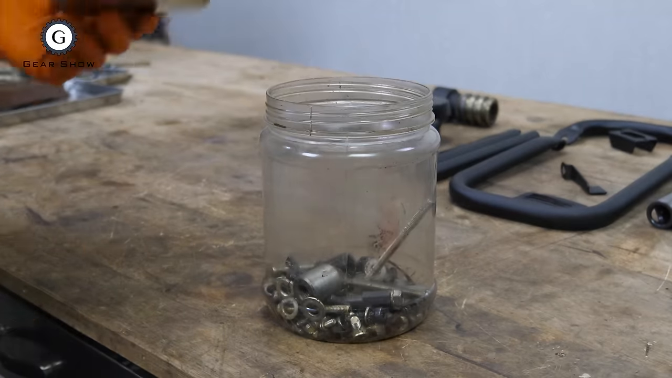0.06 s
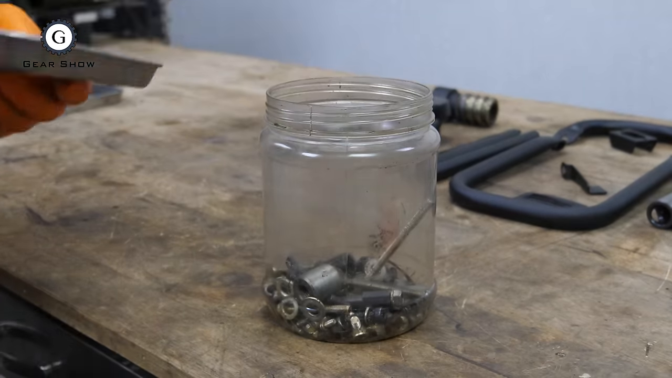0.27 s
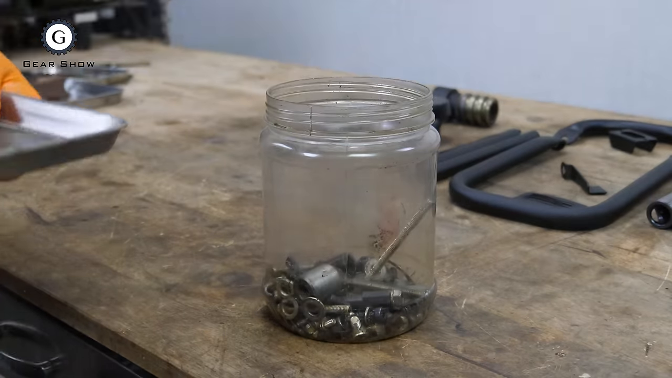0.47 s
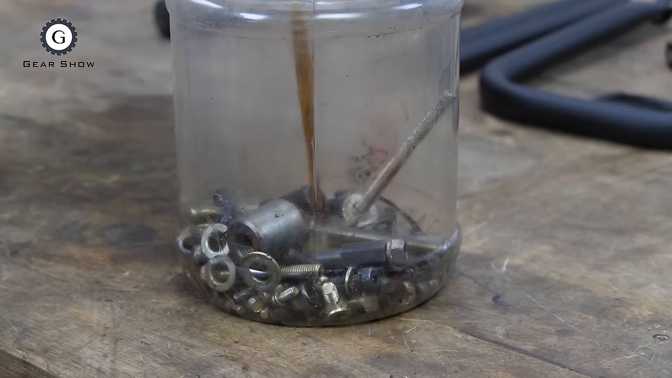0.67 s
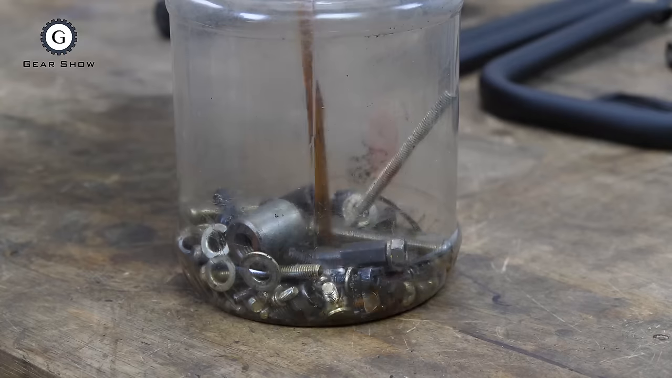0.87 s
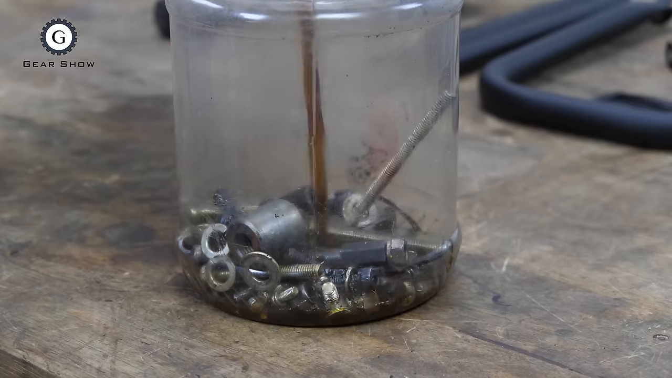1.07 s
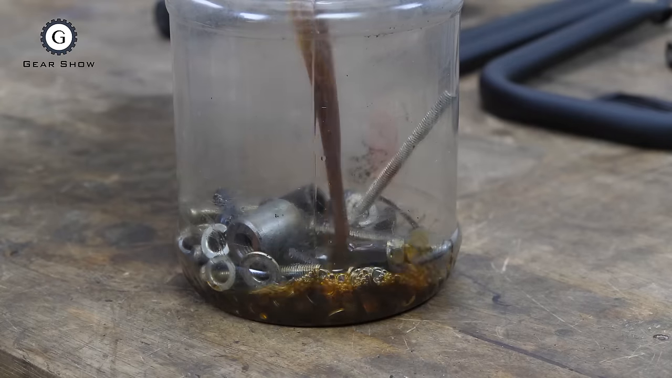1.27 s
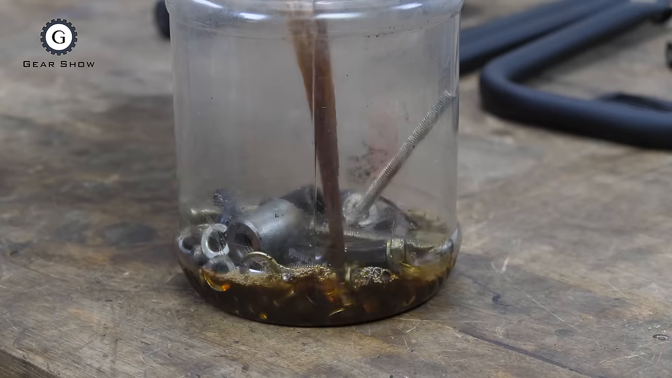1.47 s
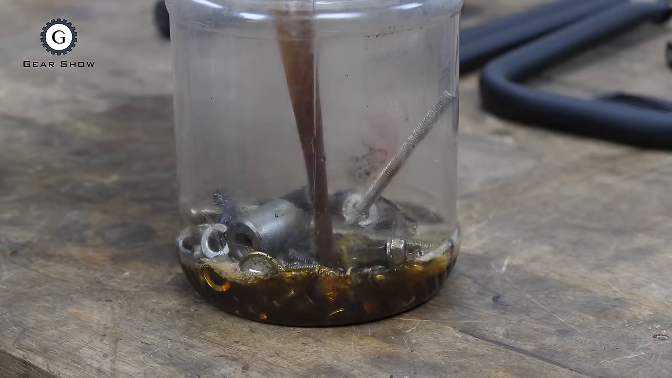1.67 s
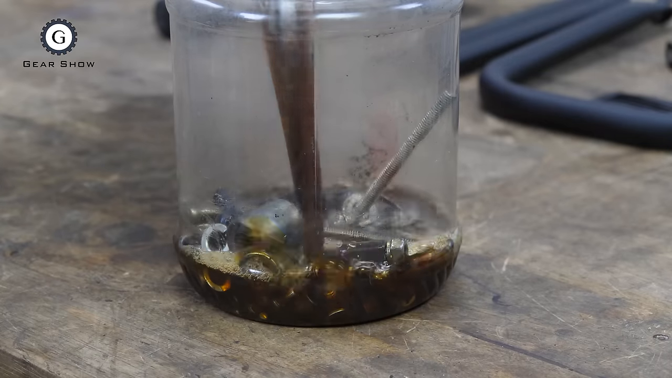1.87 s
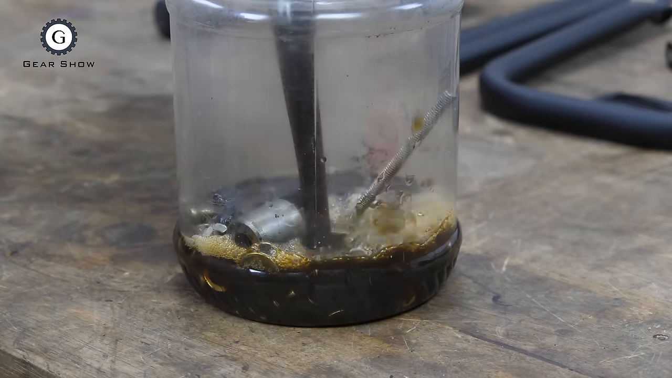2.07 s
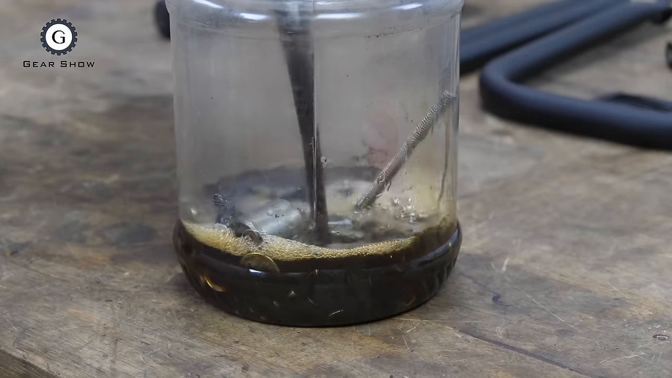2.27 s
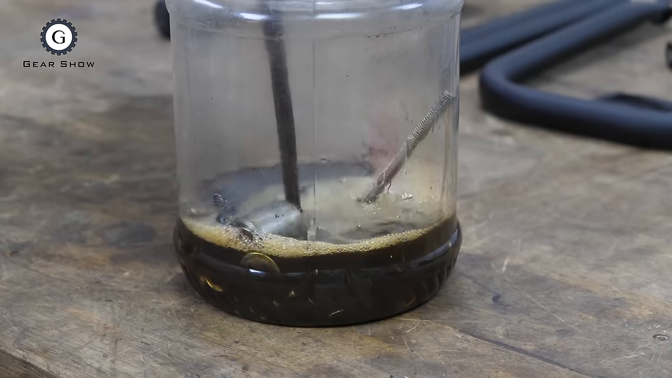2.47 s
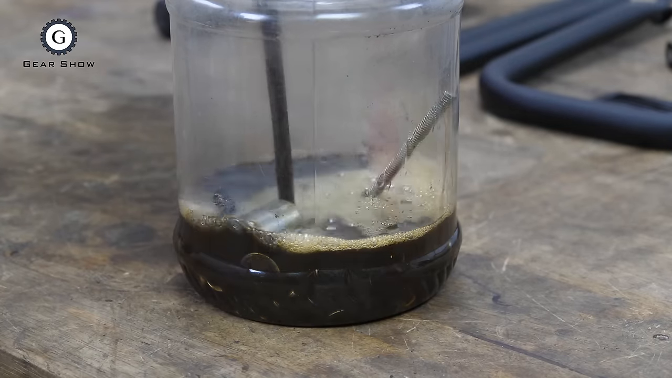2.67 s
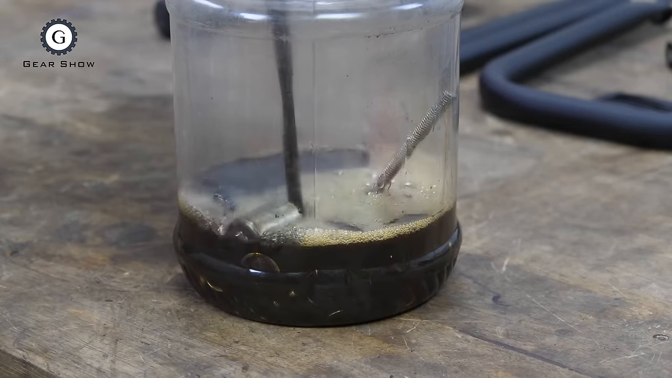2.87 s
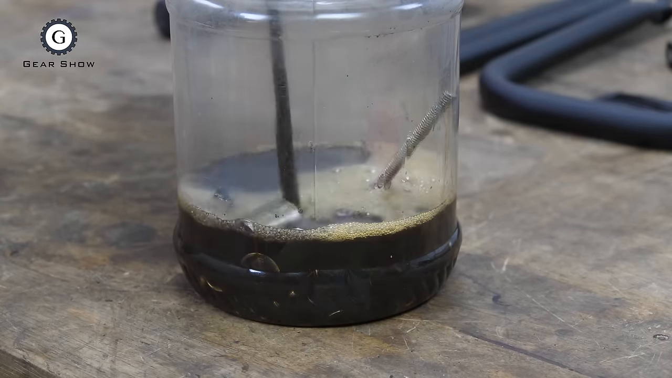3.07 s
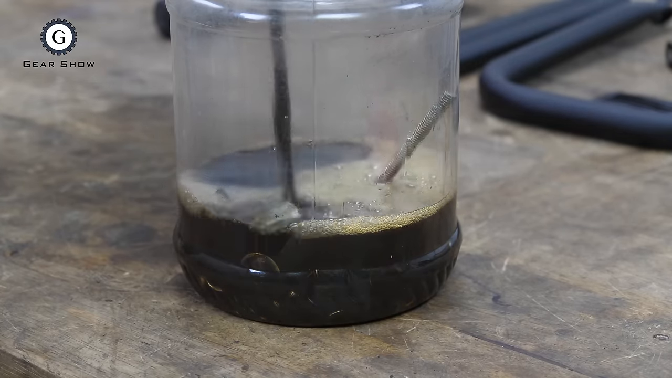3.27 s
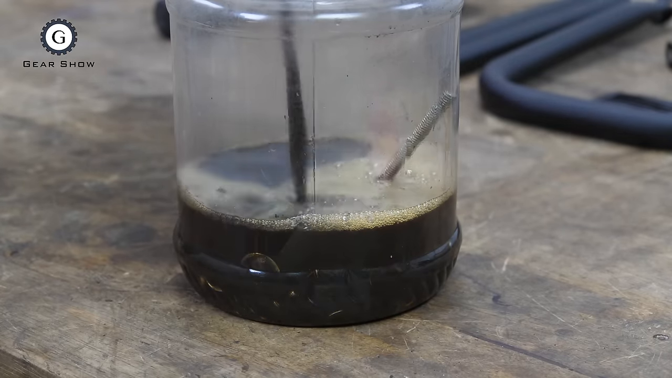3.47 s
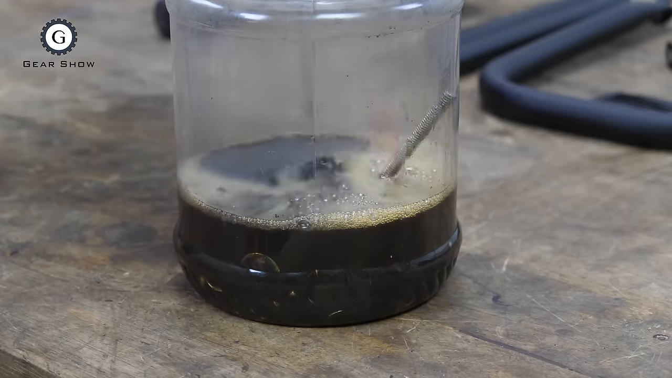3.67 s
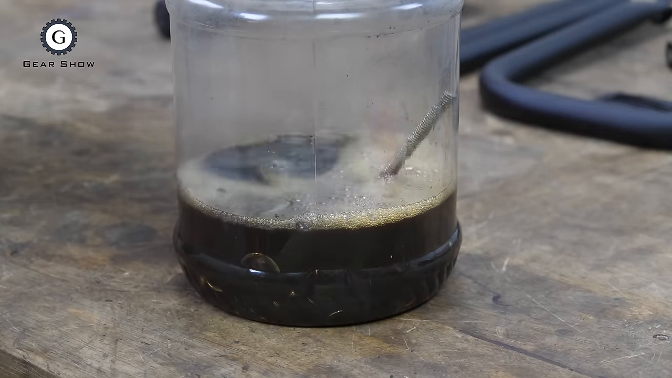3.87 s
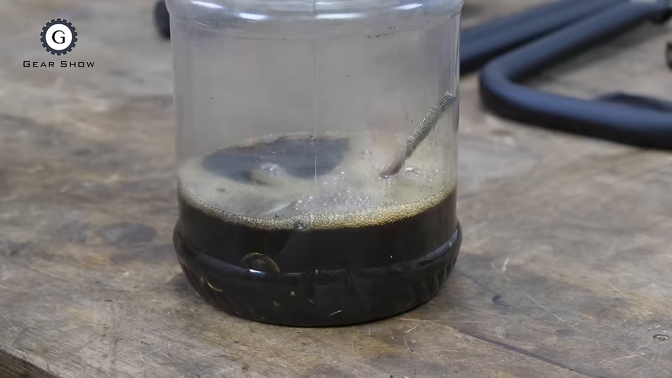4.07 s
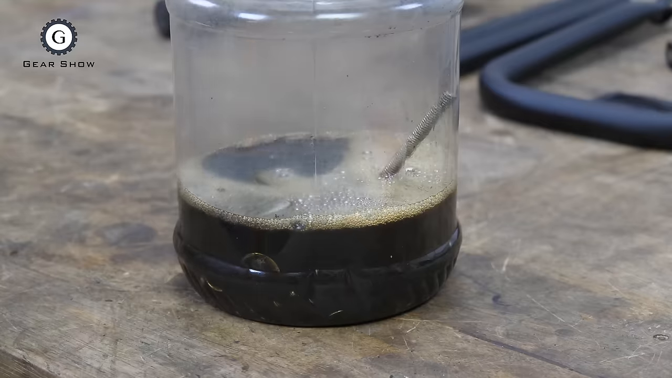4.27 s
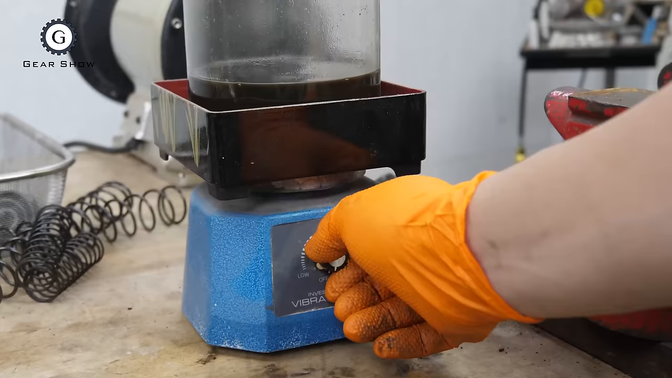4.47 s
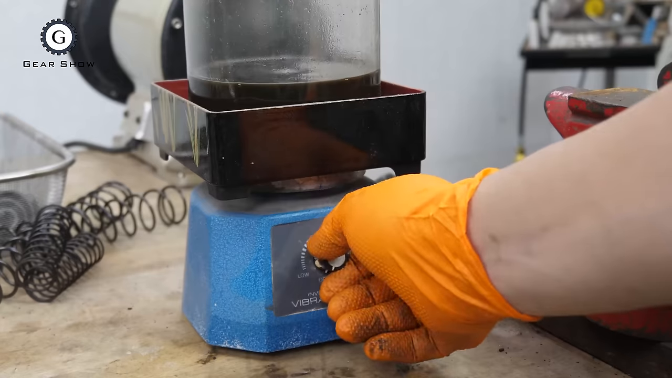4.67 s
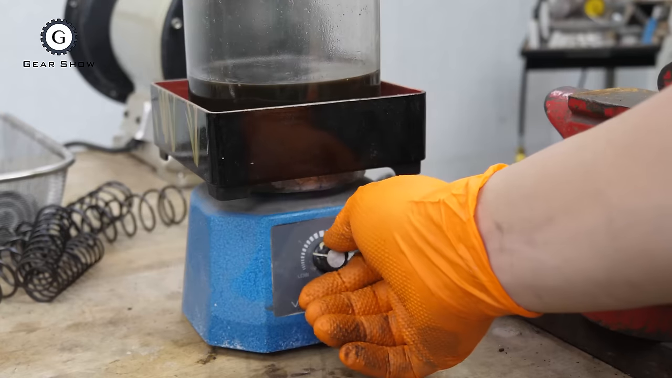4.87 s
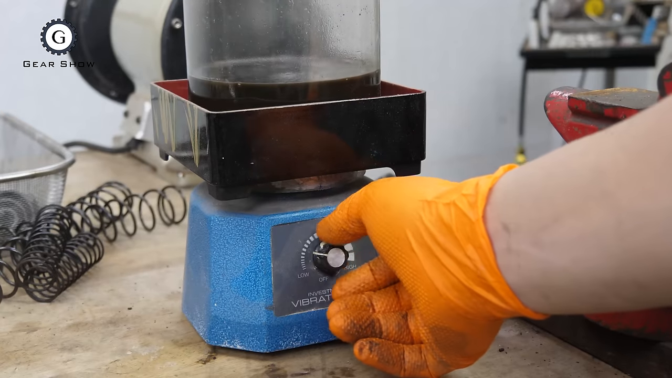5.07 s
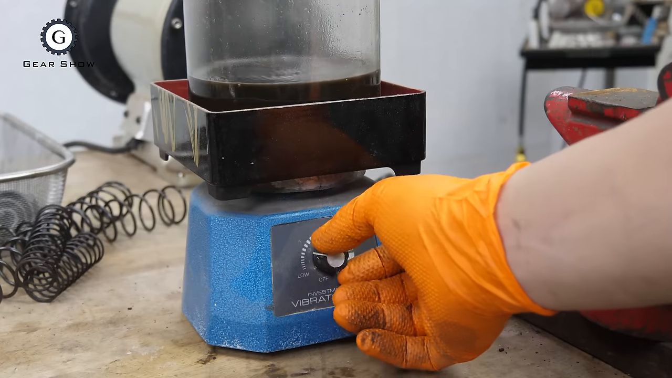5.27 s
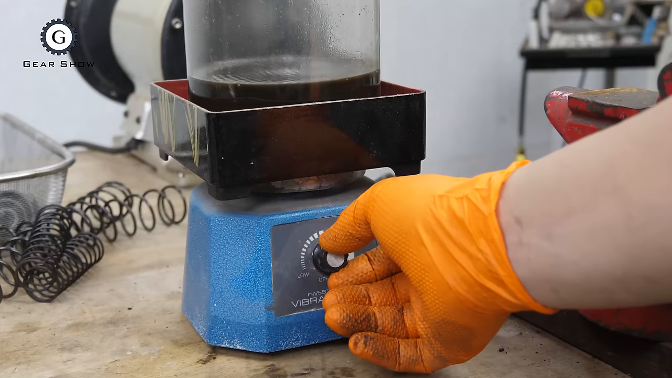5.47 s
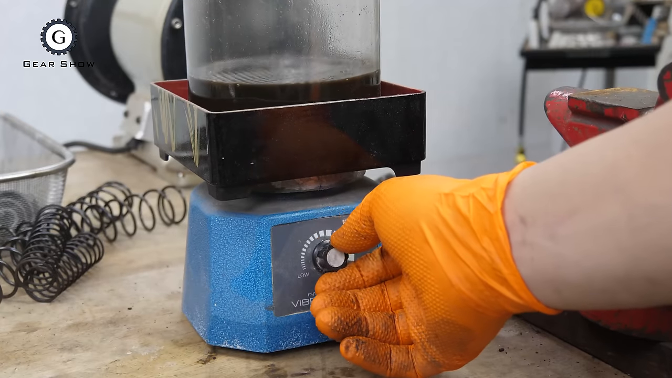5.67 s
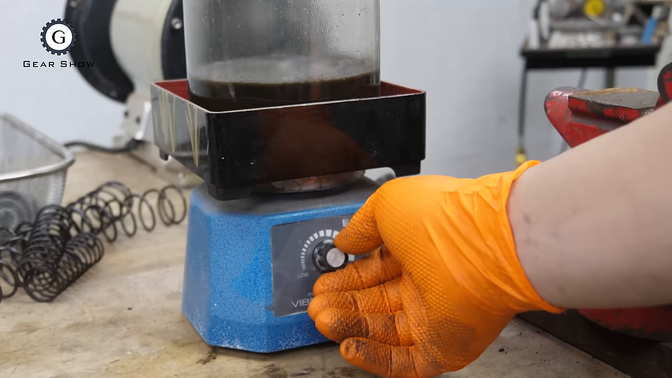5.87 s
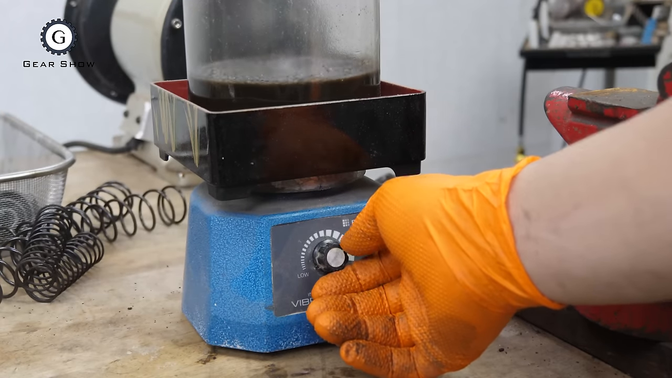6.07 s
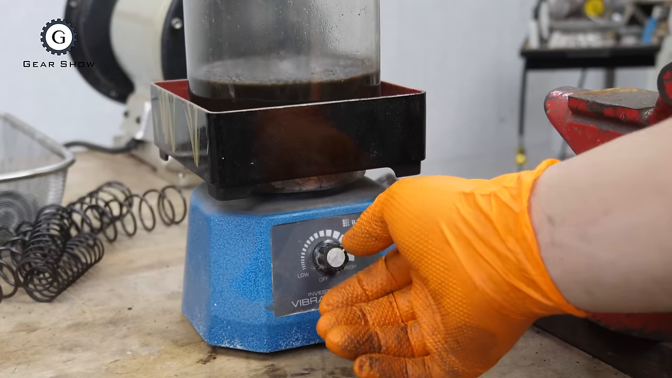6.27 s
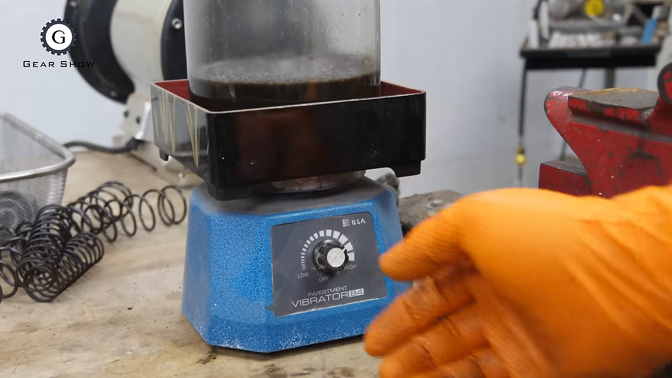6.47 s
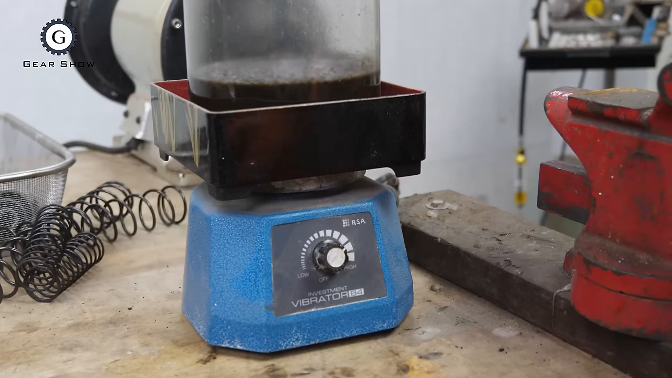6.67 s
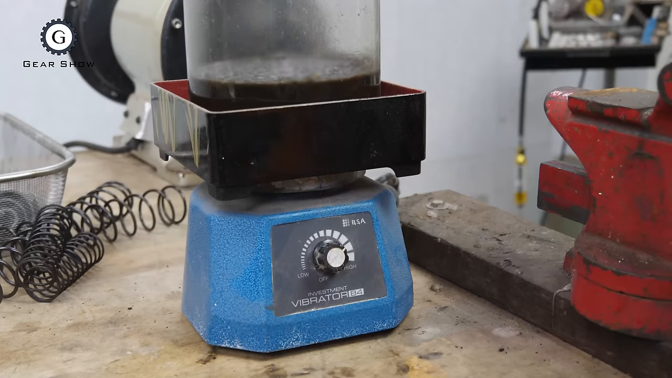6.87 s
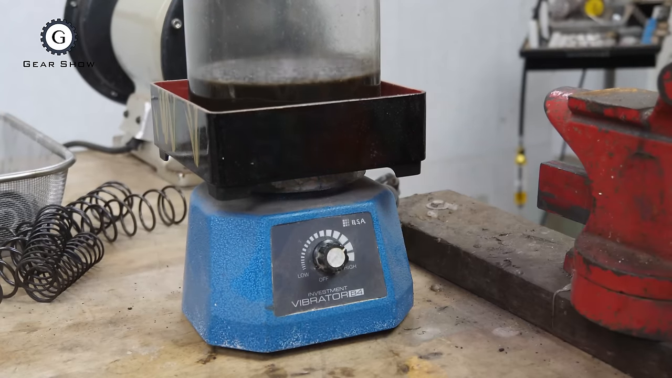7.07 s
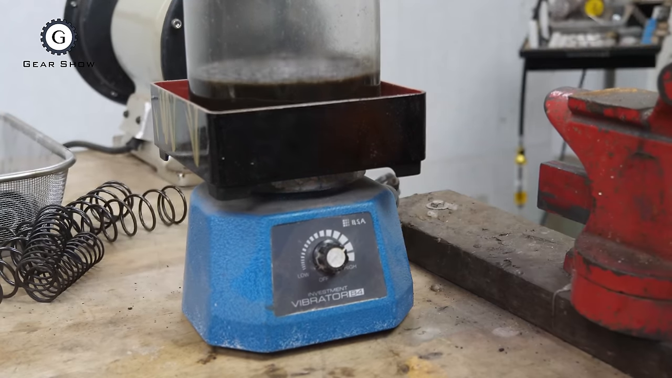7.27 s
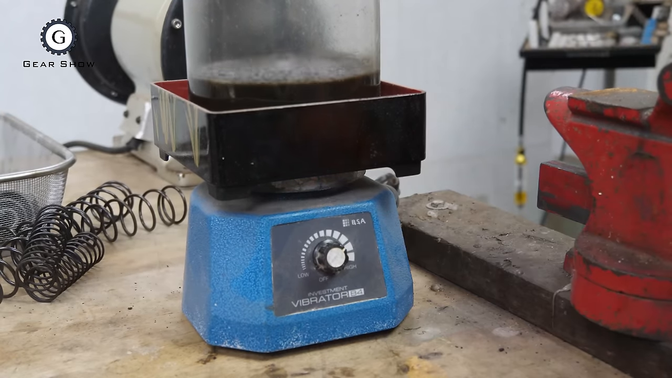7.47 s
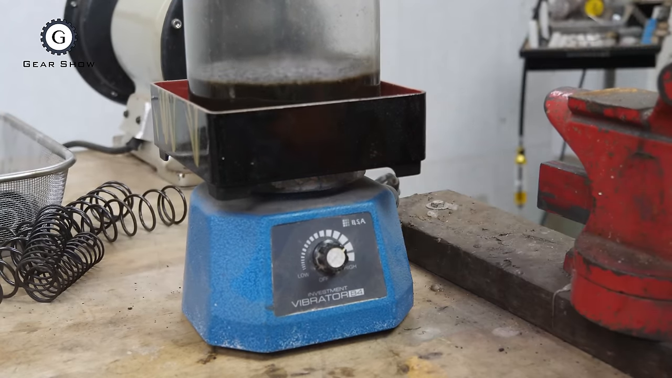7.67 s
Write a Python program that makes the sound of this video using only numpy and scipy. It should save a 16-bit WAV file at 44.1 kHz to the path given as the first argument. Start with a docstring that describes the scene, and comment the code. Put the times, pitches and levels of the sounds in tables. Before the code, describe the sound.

Very faint workshop air, with a slight stir near 0.3 s. At 0.7 s a close, dry pour cuts in over a low room hum: bright, hissing spray on bare metal in a plastic jar, with a faint high ping. It thickens from 1.25 s, gulps deeply around 2.0 and 2.25 s, then thins to a dripping trickle from 2.5 s, with bubbles ringing in the jar. A fuller gurgle returns at 3.3-3.6 s and a last sharp splat falls near 3.8 s. Light rustling and a tiny falling scrape lead to a dull wooden knock at 4.07 s with a small rebound. Near silence from 4.4 s. At 4.85 s a switch snaps with a short springy ring, and a hundred-beat-per-second buzz begins, with jar clatter and fine metal rattle. Around 5.5-5.7 s it stumbles with knocks, then shakes louder and rougher, easing slightly, its middle hum stronger after 7 s, running to the end.

```python
"""A workshop bench: liquid is poured over loose metal parts in a plastic jar, then something is set down.
The stream is filtered droplet noise with bubbles and plops; the set-down is a scrape, thuds and ringing modes.
After a short silence a switch snaps and a vibratory tumbler shakes the jar a hundred times a second,
with hum lines locked to the beat and noise bursts for jar and parts.
Its knob is turned up: the buzz stumbles, then the jar bounces harder, every second blow unlike the first."""
import sys
import numpy as np
from scipy import signal
from scipy.fft import rfft, irfft
from scipy.io import wavfile
from scipy.ndimage import uniform_filter1d, map_coordinates

SR = 44100
rng = np.random.default_rng(int(sys.argv[2]) if len(sys.argv) > 2 else 0)


def dump(signal):
    """Clip the signal to [-1, 1] and save it as 16-bit WAV at the path in sys.argv[1]."""
    limited = np.clip(np.atleast_2d(signal).T, -1, 1)
    pcm = np.round(limited * 32767).astype(np.int16)
    wavfile.write(sys.argv[1], SR, pcm)


N = 340011
TIME = np.arange(N) / SR
FIRST_BLOW_S = 4.8618

# spectrum of the jar's dull thump in its tray [f/Hz, level/dB per Hz]
THUMP_COLOUR = [(70, -43), (120, -18.5), (190, -6), (310, 0), (500, 2), (640, -12.5), (1000, -21)]
# spectrum of the shaken jar [f/Hz, level/dB per Hz]
CLATTER_COLOUR = [(50, -43), (90, -33.5), (160, -14), (330, -6.5), (480, 0.5), (750, -4), (1100, -1.5),
                  (1350, -1.5), (1700, 4.5), (2100, -2.5), (2500, -4.5), (3000, -15), (4500, -26)]
# spectrum of the metal parts in it [f/Hz, level/dB per Hz]
RATTLE_COLOUR = [(1500, -27), (2500, -1), (3100, -3), (3700, 0.5), (4900, 2), (5600, -4.5), (6300, -6),
                 (7200, -2.5), (8500, -11.5), (9400, -7.5), (11000, -13.5), (13500, -13.5), (15500, -21.5)]
# spectrum of splashing in the jar, also of low rasps [f/Hz, level/dB per Hz]
SPLASH_COLOUR = [(700, -9), (1300, -14), (1750, -3), (2500, -2), (3000, -2), (3900, -3), (4500, 4),
                 (5200, -5.5), (6500, -15)]
# middle resonances of the air in the jar [f/Hz, width/Hz, level/dB]
JAR_MID_PEAKS = [(3240, 185, 0.012), (3580, 280, -1.6), (4770, 360, -1)]
# high resonances of the air in the jar [f/Hz, width/Hz, level/dB]
JAR_HIGH_PEAKS = [(6100, 280, -3.5), (7450, 240, 2.5), (9000, 247, -1.5), (9630, 450, 1.5),
                  (11260, 390, -3.5), (12900, 800, -3)]


def amp(db):
    """Decibels to gain."""
    return 10 ** (np.asarray(db) / 20)


def unit(x):
    """Scales to rms 1."""
    return x / np.sqrt(np.mean(x ** 2) + 1e-20)


def curve(rows, column=1):
    """One column of a timed table, at every sample."""
    rows = np.array(rows)
    return np.interp(TIME, rows[:, 0], rows[:, column])


def read(points, hz):
    """A spectrum joined by straight lines over log frequency."""
    f, value = np.transpose(points)
    return np.interp(np.log(hz + 1), np.log(f), value)


def during(start, end):
    """A gate with 3 ms edges."""
    opening = np.clip((TIME - start) / .003, 0, 1)
    closing = np.clip((end - TIME) / .003, 0, 1)
    return opening * closing


def swell(peak, rise, fall):
    """A smooth hump of height 1."""
    return np.exp(-((TIME - peak) / np.where(TIME < peak, rise, fall)) ** 2)


def ramp(end, length):
    """Goes from 0 to 1, arriving at a given time."""
    return np.clip(1 + (TIME - end) / length, 0, 1)


def add(mix, s, sound):
    """Mixes a sound in at a time."""
    part = mix[..., round(s * SR):][..., :sound.shape[-1]]
    part += sound[..., :part.shape[-1]]


def drift(rate):
    """Random wobble of rms 1, up to a given rate in Hz."""
    hz = np.fft.rfftfreq(N, 1 / SR)
    return unit(irfft(rfft(rng.standard_normal(N)) / (1 + (hz / rate) ** 4), N))


def colour(x, points):
    """Causal filter with a given spectrum that falls away beyond its ends; keeps the power of white noise."""
    hz = np.fft.rfftfreq(4096, 1 / SR) + 1
    octaves_beyond = np.log2(np.maximum(np.maximum(points[0][0] / hz, hz / points[-1][0]), 1))
    log_gain = np.log(amp(read(points, hz) - 20 * octaves_beyond))
    # the Hilbert transform of the log gain gives the minimum phase
    response = np.exp(signal.hilbert(np.r_[log_gain, log_gain[-2:0:-1]]).conj())
    taps = np.fft.ifft(response).real[:len(hz)]
    taps = np.array(taps / np.linalg.norm(taps), ndmin=x.ndim)
    return signal.oaconvolve(x, taps, axes=-1)[..., :x.shape[-1]]


def resonate(x, peaks):
    """Steep resonances side by side, each filtered twice."""
    out = 0
    for hz, width, db in peaks:
        b, a = signal.iirpeak(min(hz, SR / 2 - 1), hz / width / np.sqrt(2), SR)
        once = signal.lfilter(b, a, x)
        out = out + amp(db) * signal.lfilter(b, a, once)
    return out


def ring(modes):
    """Dying modes after one blow, peak 1; decay times are held between 5 and 250 ms."""
    t = TIME[:SR // 2]
    sound = 0
    for hz, db, t60 in modes:
        fade = amp(db - 60 * t / np.clip(t60, .005, .25))
        sound = sound + fade * np.sin(2 * np.pi * hz * t)
    return sound / abs(sound).max()


def spread(pair, side_db):
    """Turns two unrelated signals into left and right."""
    return pair[0] + amp(side_db) * np.array([pair[1], -pair[1]])


def room(x):
    """The workshop's tail: random reflections from 4 ms on, each band dying at its own pace."""
    # decay of the workshop [f/Hz, t60/s]
    room_t60 = [(200, 0.23), (1000, 0.25), (4000, 0.64), (15000, 0.19)]
    hz, t, z = signal.stft(rng.standard_normal((2, SR // 2)), SR, nperseg=256)
    fade = amp(-60 * t / read(room_t60, hz)[:, None])
    tail = signal.istft(z * fade, SR, nperseg=256)[1]
    tail[:, :SR // 250] = 0
    return signal.fftconvolve(x[None], tail / np.linalg.norm(tail[0]), axes=1)[:, :N]


def tumbler():
    """Each blow of the shaker drives the housing's hum, a clatter of the jar and a burst of rattling parts."""
    # beat of the shaker [t/s, rate/blows per s]
    beat = [(4.8, 100.04), (6.0, 100.05), (6.6, 100.1), (7.8, 100.11)]
    turns = np.cumsum(curve(beat)) / SR
    turns -= np.interp(FIRST_BLOW_S, TIME, turns)
    on = turns > 0
    knob, stumble, gains = (control[..., on] for control in drive())
    hum_gain, clatter_gain, rattle_gain = gains
    blow = turns[on].astype(int)
    phase = turns[on] % 1

    def noise(*channels):
        """White noise while the tumbler runs."""
        return rng.standard_normal((*channels, len(phase)))

    def burst(rise, fall, rest):
        """Envelope within one beat, in shares of the beat."""
        return unit(rest + (1 - np.exp(-phase / rise)) * np.exp(-phase / fall))

    def uneven(spread_db):
        """A strength of its own for every blow."""
        return amp(spread_db * noise())[blow]

    hum = housing_hum(turns, on, knob)
    thumps = noise() * uneven(spread_db=1.5) * burst(rise=0.094, fall=.15, rest=0.024)
    thumps = unit(colour(thumps, THUMP_COLOUR))
    body = np.sqrt(1 - stumble) * hum + np.sqrt(stumble) * thumps

    # driven hard, the jar bounces in a pattern two blows long
    gentle_contact = 0.64 * np.sqrt(1 - knob) * repeating(turns, memory=11.0, blows=1)
    hard_contact = np.sqrt(knob) * repeating(turns, memory=4.45, blows=2)
    contact = gentle_contact + hard_contact + 0.8 * noise(2)
    clatter = contact * uneven(spread_db=1.0) * burst(rise=0.22, fall=0.23, rest=0.32)
    clatter = unit(colour(clatter, CLATTER_COLOUR))

    parts = noise(2) + 0.36 * repeating(turns, memory=11, blows=2)
    rattle = parts * uneven(spread_db=0.88) * burst(rise=0.11, fall=0.17, rest=0.16)
    rattle = unit(colour(rattle, RATTLE_COLOUR))
    # gentle blows raise less of the highest treble
    dull = signal.sosfilt(signal.butter(1, 9500, fs=SR, output="sos"), rattle)
    rattle = knob * rattle + (1 - knob) * unit(dull)

    out = np.zeros((2, N))
    out[:, on] = (body * hum_gain * amp([[-.5], [.45]])
                  + spread(clatter, side_db=-9.5) * clatter_gain * amp([[-.4], [.4]])
                  + spread(rattle, side_db=-15.5) * rattle_gain)
    return out


def housing_hum(turns, on, knob):
    """The housing hums in lines at multiples of half the beat, held to an even level overall."""
    # lines of the hum [multiple of half the beat, gentle level/dB, hard level/dB]
    hum_lines = [(2, -31, -52), (3, -39, -28), (4, -1.5, -10.5), (5, -19, -15.5), (6, -11, -15.5),
                 (7, -13, -10), (8, 2, -1), (9, -18, -5.5), (10, -8, 2), (11, -28, -19), (12, -2, -16.5),
                 (13, -28, -18.5), (14, -22, -17), (16, -11.5, -25), (17, -32, -16), (18, -16, -12),
                 (19, -28, -17), (20, -7, -19.5), (22, -2.5, -22), (24, -7, -23), (31, -30, -13.5),
                 (33, -28, -13.5), (36, -5, -24)]
    turns, time = turns[on], TIME[on]

    def wander(per_s):
        """Slow chance."""
        return np.interp(time * per_s, np.arange(len(time)), rng.standard_normal(len(time)))

    # near the end the load shifts and the middle of the hum comes forward
    shifted_db = 7.3 * ramp(end=7.25, length=.3)[on]
    hum = 0
    for order, gentle_db, hard_db in hum_lines:
        # the housing answers a little after each blow; the lines between the beat's own waver most
        slip = (0.023 + 0.061 * (order % 2)) * order * wander(per_s=4)
        angle = np.pi * order * (turns - 1 - .3) + slip + 0.0601 * (order - 9) ** 2
        sway_db = (0.0437 + 0.027 * knob) * order * wander(per_s=9)
        shift_db = shifted_db * np.exp(-((order - 12.9) / 2.0) ** 2)
        level = (1 - knob) * amp(gentle_db) + knob * amp(hard_db)
        hum = hum + level * amp(sway_db + shift_db) * np.cos(angle)
    return hum / np.sqrt(uniform_filter1d(hum ** 2, SR // 25))


def repeating(turns, memory, blows):
    """Contact noise that nearly repeats after a number of blows, changing as the parts shift."""
    size = blows * SR // 100  # samples in one pattern
    fresh = rng.standard_normal((2, N // size + 2, size))
    # each pattern keeps a share of the last; memory is in blows
    pattern = signal.lfilter([1], [1, -np.exp(-blows / memory)], fresh, axis=1).reshape(2, -1)
    place = (turns + 100) * size / blows  # starts where the pattern has built up
    return unit(np.array([map_coordinates(p, [place], order=3) for p in pattern])[:, turns > 0])


def drive():
    """From the knob: how hard and how irregularly the jar bounces, and the gains of hum, clatter and rattle."""
    # turning of the knob [t/s, setting from 0 gentle to 1 hard]
    knob_turn = [(5.48, 0.08), (5.6, 0.49), (5.68, 0.57), (5.74, 1)]
    # the jar briefly loses its bounce and clatters less [t/s, half length/s, depth/dB]
    lulls = [(5.489, 0.025, 6), (5.586, .012, 6.5), (5.635, .016, 3.5), (5.972, 0.1, 1)]
    # levels of the three voices: (dB when gentle, dB when hard)
    hum_range, clatter_range, rattle_range = (-37, -32), (-34.5, -32), (-38.5, -36)
    knob = curve(knob_turn)
    running = np.maximum(TIME - FIRST_BLOW_S, 0)
    spin_up = 1 - 0.52 * np.exp(-running / .025)  # the shaking builds up after the switch

    # the first blows are irregular, and the jar stumbles again as the knob turns
    unsettled = 0.91 * (1 - ramp(end=5.02, length=.1))
    turn_stumble = 0.68 * swell(peak=5.62, rise=.14, fall=0.088)
    stumble = np.clip(unsettled + turn_stumble + 0.013, 0, 1)

    lull_db = sum(depth * swell(s, half, half) for s, half, depth in lulls)
    # at full drive the hum overshoots, then eases off
    overshoot_db = 2.5 * swell(knob_turn[-1][0], rise=.05, fall=0.76)
    hum_db, clatter_db, rattle_db = (
        gentle + knob * (hard - gentle) for gentle, hard in (hum_range, clatter_range, rattle_range))
    levels_db = [hum_db + overshoot_db - stumble * lull_db, clatter_db - lull_db, rattle_db - lull_db]
    return knob, stumble, spin_up * amp(levels_db)


def switch_and_jolts():
    """The switch snaps and its spring rings; the jar knocks in its tray as the drive starts and rises."""
    # spectrum of the snap [f/Hz, level/dB per Hz]
    snap_colour = [(300, -15), (1200, -21), (2700, -5), (4200, -4), (6000, 0), (9500, 2), (12000, -2.5),
                   (15500, -6)]
    # modes of the switch [f/Hz, level/dB, t60/s]
    spring_modes = [(1254, -14.5, 0.1), (2720, -3, 0.037), (3952, -3, 0.18), (8183, -7, .04),
                    (9670, -1, 0.046)]
    # knocks of the jar [t/s, level/dB]
    jolt_times = [(4.893, -34), (5.512, -24.5), (5.601, -23), (5.613, -28), (5.621, -28), (5.672, -29),
                  (5.714, -27)]
    t, snap, jolts = TIME[:SR // 2], np.zeros(N), np.zeros(N)
    # noise that holds for 2.8 ms, then dies
    crack = rng.standard_normal(len(t)) * np.exp(-np.maximum(t - .0028, 0) / 0.0019)
    crack = colour(crack, snap_colour)
    add(snap, 4.8428, amp(-45) * crack)  # the contact starts to slide
    add(snap, 4.8452, amp(-22.0) * crack + amp(-21.5) * ring(spring_modes))
    for s, db in jolt_times:
        add(jolts, s, amp(db) * rng.standard_normal(len(t)) * np.exp(-t / 0.0033))
    knocks = (amp(-2.5) * colour(jolts, THUMP_COLOUR)
              + amp(-2) * colour(jolts, CLATTER_COLOUR)
              + amp(-8) * colour(jolts, RATTLE_COLOUR))
    return snap + amp(-3.5) * room(snap) + knocks


def pour():
    """The stream hisses on bare metal; once the parts are covered, sparser drops ring the air in the jar."""
    # share of the stream that lands in liquid and not on metal [t/s, share 0-1]
    covered_share = [(.7, 0.13), (1.9, 0), (2.3, 0.36), (2.55, 0.58), (3.3, 0.92), (3.85, 0.92)]
    # spectrum of the spray off bare metal [f/Hz, level/dB per Hz]
    spray_colour = [(4000, -33.5), (5600, -6.5), (7000, -1), (8300, 0), (9800, 5), (11500, 1.5),
                    (14000, 1.5), (15600, -1.5)]
    # resonances of the jar while the metal is still bare [f/Hz, width/Hz, level/dB]
    empty_peaks = [(2940, 220, -1), (3340, 220, -2.5), (3780, 200, -2), (4340, 270, 0), (4645, 240, 1.5),
                   (4940, 160, -1.5)]
    # lowest resonance of the air in the jar [f/Hz, width/Hz, level/dB]
    low_peaks = [(1020, 160, 0)]
    covered = curve(covered_share)
    metal, pool = np.sqrt(1 - covered), np.sqrt(covered)
    fine = droplets(per_s=3000, size_db=3.5, wash=.6)
    coarse = droplets(per_s=450, size_db=3.5, wash=0.55)

    spray = 0.94 * metal * unit(colour(fine, spray_colour))
    spray = spray + 0.73 * pool * unit(resonate(coarse, JAR_HIGH_PEAKS))
    spray = spray + 0.23 * bubbles(low_hz=6490, high_hz=13900, per_s=700, cycles=48)

    metal_splash = 0.64 * unit(colour(fine, SPLASH_COLOUR)) + 0.45 * unit(resonate(fine, empty_peaks))
    pool_splash = 0.62 * unit(resonate(coarse, JAR_MID_PEAKS)) + 0.29 * unit(colour(coarse, SPLASH_COLOUR))
    pool_splash = pool_splash + 0.33 * bubbles(low_hz=2895, high_hz=5020, per_s=180, cycles=16)
    splash = metal * metal_splash + pool * pool_splash

    gurgle = (0.26 * metal + 0.85 * pool) * unit(resonate(coarse, low_peaks))
    churn = unit(resonate(fine, [(190, 41, -0.5), (278, 73, -1)]))  # (Hz, width Hz, dB)

    flow, splash_gain, gurgle_gain, churn_gain = stream_gains()
    liquid = spray * flow + splash * splash_gain + gurgle * gurgle_gain
    stream = shimmer(liquid, patchy_db=2.5) + churn * churn_gain
    return spread(stream, side_db=-11.0) * during(0.67, 4.376)


def stream_gains():
    """Strength of the stream over time, and from it the gains of spray, splash, gurgle and churning."""
    # the stream thickens, thins to a trickle, and the last of it is tipped in [t/s, level/dB]
    flow_levels = [(0.7, -77), (0.85, -56.5), (1.17, -57), (1.26, -52.5), (1.5, -52.5), (1.7, -56),
                   (2.1, -54), (2.43, -58), (2.52, -66.5), (3.13, -68), (3.3, -59.5), (3.67, -60),
                   (3.78, -54), (3.88, -68)]
    # spurts that jump up and die away [t/s, level above the flow/dB]
    spurts = [(0.722, 7), (0.9, 5.5), (2.345, 1), (2.62, 9), (3.15, 8), (3.772, 5.5)]
    # plunges that drag air under [peak t/s, rise/s, fall/s, gurgle level/dB, low churning level/dB]
    gulps = [(1.99, .04, 0.066, -57.5, -62.5), (2.25, 0.11, .15, -63, -66), (3.39, 0.011, .035, -49.5, -72),
             (3.46, 0.2, .14, -60.5, -71.5), (3.77, .04, 0.034, -57.5, -76)]
    rise, fall = .006, 0.045  # s, of a spurt
    spurts_db = sum(db * swell(s + rise, rise, fall) for s, db in spurts)
    flow = amp(curve(flow_levels) + spurts_db) * (1 - ramp(end=3.97, length=0.091))
    # the stream splashes less until a puddle has formed
    dry_db = -7.5 * (1 - ramp(end=1.217, length=.04))
    splash_gain = flow * amp(-2 + dry_db)
    gurgle_gain, churn_gain = flow * amp(-19.5), 0
    for peak, rise, fall, gurgle_db, churn_db in gulps:
        gulp = swell(peak, rise, fall)
        gurgle_gain = gurgle_gain + amp(gurgle_db) * gulp
        churn_gain = churn_gain + amp(churn_db) * gulp
        splash_gain = splash_gain + amp(gurgle_db - 4.5) * gulp  # each gulp also splashes
    return flow, splash_gain, gurgle_gain, churn_gain


def droplets(per_s, size_db, wash):
    """Tiny impacts of uneven size over a wash of still smaller ones."""
    sizes = amp(size_db * np.minimum(rng.exponential(1, (2, N)), 3.5))
    sizes = sizes * rng.choice([-1, 1], (2, N))
    impacts = unit(sizes * (rng.random((2, N)) < per_s / SR))
    return unit(impacts + wash * rng.standard_normal((2, N)))


def bubbles(low_hz, high_hz, per_s, cycles, count=24):
    """Bubbles of many sizes, each a short dying note that rises a little."""
    t, out = TIME[:SR // 20], np.zeros(N)
    for hz in np.geomspace(low_hz, high_hz, count) * rng.uniform(0.94, 1.03, count):
        note = np.exp(-t * hz / cycles) * np.sin(2 * np.pi * hz * t * (1 + 1.2 * t))
        # scattered over the first 4.4 s
        for s, size in rng.random((round(per_s * 5 / count), 2)):
            add(out, 4.4 * s, amp(18 * size ** 2) * note)
    return unit(out)


def shimmer(x, patchy_db):
    """The stream's landing point wanders, so its colour shifts in patches of time and frequency."""
    z = signal.stft(x, SR, nperseg=512, noverlap=384)[2]
    patches = rng.standard_normal(z.shape[1:])
    patches = uniform_filter1d(patches, size=4, axis=0)
    patches = unit(uniform_filter1d(patches, size=18, axis=1))
    return signal.istft(z * unit(amp(patchy_db * patches)), SR, nperseg=512, noverlap=384)[1][:, :N]


def plops():
    """Larger splats: a short splash, one bubble's note and a cluster of smaller ones around its pitch."""
    # single splats and plops [t/s, level/dB, f/Hz]
    plop_times = [(0.726, -47, 9310), (0.905, -44, 3840), (0.91, -39, 11400), (0.93, -37, 10760),
                  (1.12, -43, 11800), (1.225, -45, 4940), (1.945, -35, 1880), (1.979, -34, 1750),
                  (1.999, -38, 1720), (2.35, -45, 4700), (2.774, -40, 7530), (3.155, -45, 3290),
                  (3.288, -44, 5240), (3.382, -34, 1020), (3.436, -37, 3650), (3.485, -39, 3310),
                  (3.64, -45, 3670), (3.68, -45, 3180), (3.748, -41, 7430), (3.774, -30.5, 9400),
                  (3.776, -39.5, 3950), (3.814, -37, 11500), (3.957, -36.5, 7830)]
    t, out = TIME[:SR // 5], np.zeros(N)
    for s, db, hz in plop_times:
        a, b = rng.standard_normal((2, len(t)))
        # t60 is 0.06 s at 1 kHz and shorter for higher plops
        fade = amp(-60 * t / 0.06 * (hz / 1000) ** 0.27)
        cluster = resonate(a * fade, [(hz, 150 + 0.13 * hz, 0)])
        # the note rises in pitch and dies sooner than the cluster's noise
        note = (1 - np.exp(-t * hz)) * fade ** 1.64 * np.sin(2 * np.pi * hz * t * (1 + .8 * t))
        splat_colour = [(150, -40), (0.67 * hz, -11), (hz + 1, 0), (16000, -17)]  # (Hz, dB per Hz)
        splat = colour(b * np.exp(-t / .0018), splat_colour)
        plop = .5 * cluster / abs(cluster).max() + 0.44 * note + 0.3 * splat / abs(splat).max()
        add(out, s, amp(db) * plop)
    out = out + amp(-5) * resonate(out, JAR_MID_PEAKS + JAR_HIGH_PEAKS)  # plops ring the air in the jar
    return (out + amp(-6.0) * room(out)) * during(.7, 4.376)


def pings():
    """Bare metal sings faintly when the stream nudges it: one high mode, wavering as it dies."""
    # nudges [t/s, level/dB]
    nudges = [(.67, -71.5), (1.26, -63)]
    ping_hz, t60_s = 3350, 1.2
    out = np.zeros(N)
    for s, db in nudges:
        add(out, s, amp(db - 60 * TIME / t60_s) * np.sin(2 * np.pi * ping_hz * TIME))
    return out * amp(2.3 * drift(rate=12)) * during(.67, 2)


def bench():
    """A short falling scrape, then a dull knock on the wooden bench with a small rebound."""
    # modes of the bench [f/Hz, level/dB, t60/s before ring() limits it]
    bench_modes = [(288, -3, 0.23), (330, -6, .17), (423, 0.5, 0.29), (663, 1.5, 0.27), (774, -7, 0.29),
                   (925, -1, .22), (1028, 3, .14), (1378, -9, 0.14), (1655, -18, 0.101), (1884, -17.5, .06),
                   (3000, -17, .25)]
    # blows on it [t/s, level/dB]
    set_down = [(4.074, -28.5), (4.101, -38.5)]
    # spectrum of the thud [f/Hz, level/dB per Hz]
    thud_colour = [(60, -64.5), (140, -29), (220, -15.5), (330, 6.5), (550, -7), (950, -1), (1400, -17),
                   (2000, -18), (3500, -50)]
    t, out = TIME[:SR // 2], np.zeros(N)
    for s, db in set_down:
        thud_fade = np.exp(-t / 0.004) + 0.35 * np.exp(-t / 0.041)
        thud = colour(rng.standard_normal(len(t)) * thud_fade, thud_colour)
        soft = 1 - np.exp(-(t / .002) ** 2)  # a soft contact takes a moment to build
        add(out, s, amp(db) * soft * (0.47 * ring(bench_modes) + 0.87 * thud / abs(thud).max()))
    scrape_hz = curve([(4.0, 2850), (4.07, 2260)])
    scrape = drift(rate=300) * np.sin(2 * np.pi * np.cumsum(scrape_hz) / SR)
    out += amp(-56.5) * swell(peak=4.02, rise=.012, fall=0.055) * scrape
    return (out + amp(-14.5) * room(out)) * during(3.98, 4.376)


def rustles():
    """Light rustles of handling late in the pour and after it: fine grains of friction that swell and fade."""
    # strokes of handling [peak t/s, rise/s, fall/s, hiss level/dB, lower rasp level/dB]
    strokes = [(3.964, 0.018, 0.025, -53.5, -64.5), (4.025, .025, 0.063, -57, -62),
               (4.37, 0.14, .02, -61.5, -65.5), (4.365, .018, 0.018, -66, -57.5)]
    # spectrum of the hiss [f/Hz, level/dB per Hz]
    hiss_colour = [(4000, -20), (5600, -3), (7500, 5), (9800, 3), (12000, -6), (15600, -7)]
    grains = droplets(per_s=3000, size_db=4.0, wash=.6)
    hiss, rasp = unit(colour(grains, hiss_colour)), unit(colour(grains, SPLASH_COLOUR))
    out = 0
    for peak, rise, fall, hiss_db, rasp_db in strokes:
        out = out + swell(peak, rise, fall) * (amp(hiss_db) * hiss + amp(rasp_db) * rasp)
    return spread(out, side_db=-8.5) * during(3.9, 4.376)


def workshop():
    """Faint room air as coloured noise with thin steady tones; louder, with one higher hum, during the pour."""
    # spectrum of the quiet air [f/Hz, level/dB per Hz]
    quiet_colour = [(40, -48), (80, -24), (140, -6), (210, -10.5), (350, -10.5), (450, -17), (650, -16),
                    (1300, -20.5), (2900, -22), (4500, -19.5), (8000, -25), (15500, -35)]
    # spectrum of the air during the pour [f/Hz, level/dB per Hz]
    air_colour = [(60, -41), (110, -47.5), (170, -4), (300, 3.5), (700, -4.5), (1400, -9.5), (3000, -14.5),
                  (7000, -18.5), (12000, -19), (14000, -12), (15400, -6)]
    # thin tones of the quiet workshop [f/Hz, level relative to its air/dB]
    whine_tones = [(300.5, -6), (3693, -19.5), (4371, -23), (6799, -23)]
    quiet = spread(unit(colour(rng.standard_normal((2, N)), quiet_colour)), side_db=-9.5)
    stir_db = 4.5 * swell(peak=0.27, rise=.05, fall=0.073)  # a faint stir before the pour
    whine = sum(np.sqrt(2) * amp(db) * np.sin(2 * np.pi * hz * TIME) for hz, db in whine_tones)
    quiet = quiet * amp(stir_db) + whine
    quiet_gain = amp(-68) * during(0, .672) + amp(-76) * during(4.58, 8)

    air = amp(-62) * spread(unit(colour(rng.standard_normal((2, N)), air_colour)), side_db=-22)
    hum = amp(-65.0 + 1.5 * drift(rate=3.6)) * np.sin(2 * np.pi * 601 * TIME)
    return quiet * quiet_gain + (air + hum) * during(.669, 4.376)


def scene():
    """All sources together."""
    shaking = tumbler() + switch_and_jolts()
    pouring = pour() + plops() + pings()
    return shaking + pouring + bench() + rustles() + workshop()


def record(dry):
    """Two close capsules hear the bass alike; then the low cut and the band limit."""
    mid, side = dry.mean(0), (dry[0] - dry[1]) / 2
    side = signal.sosfilt(signal.butter(1, 380, "high", fs=SR, output="sos"), side)
    # short waves differ most
    side = side + 0.47 * signal.sosfilt(signal.butter(2, 9000, "high", fs=SR, output="sos"), side)
    low_cut = signal.butter(2, 70, "high", fs=SR, output="sos")
    pair = signal.sosfilt(low_cut, [mid + side, mid - side])
    band_limit = signal.firwin(601, 15850, window=("kaiser", 9), fs=SR)
    return signal.oaconvolve(pair, band_limit[None], "same", axes=1)


dry = scene()
out = record(dry)
dump(out)
```